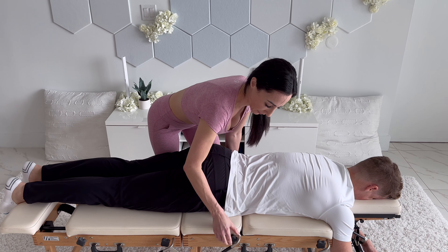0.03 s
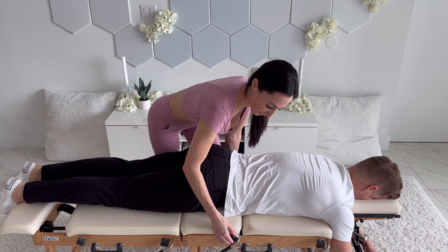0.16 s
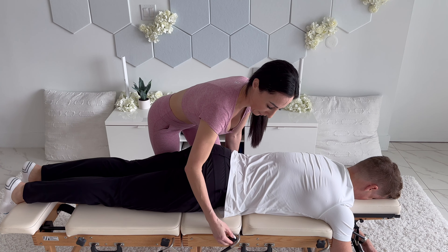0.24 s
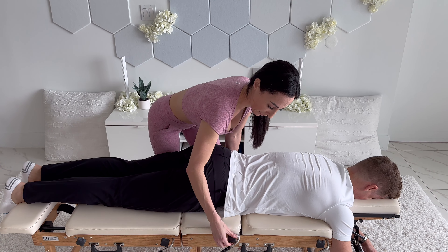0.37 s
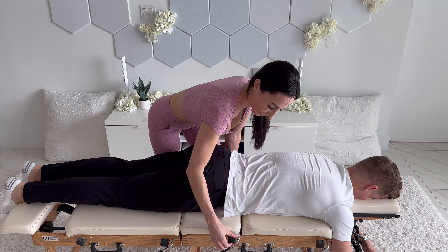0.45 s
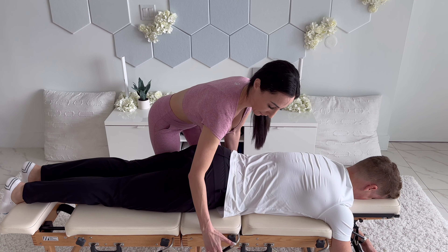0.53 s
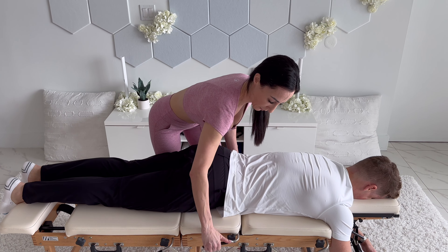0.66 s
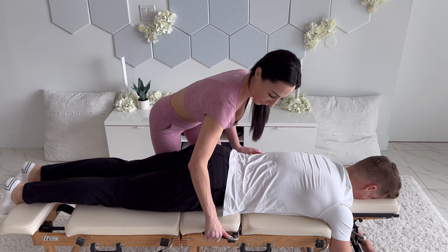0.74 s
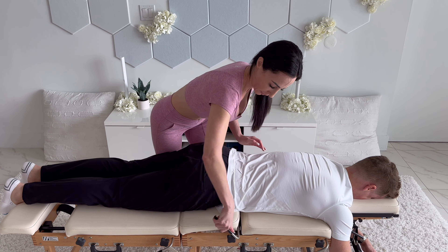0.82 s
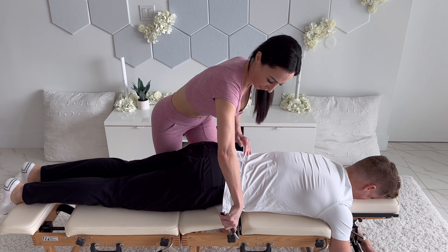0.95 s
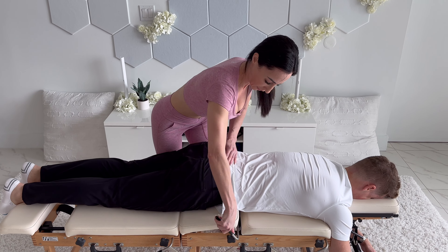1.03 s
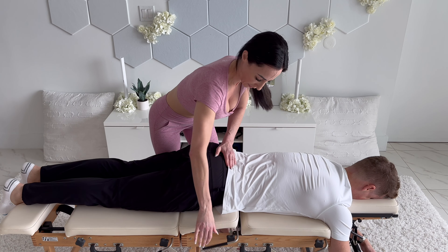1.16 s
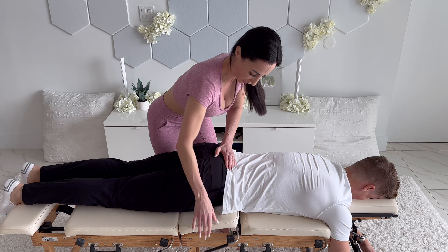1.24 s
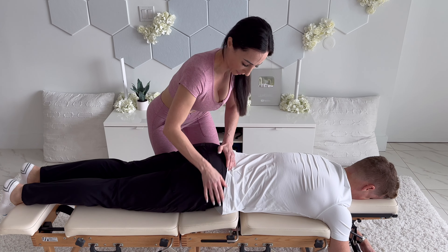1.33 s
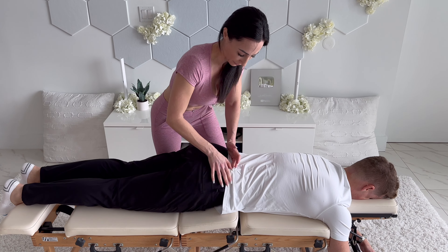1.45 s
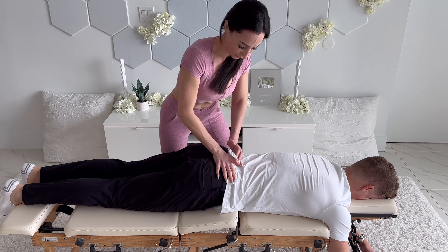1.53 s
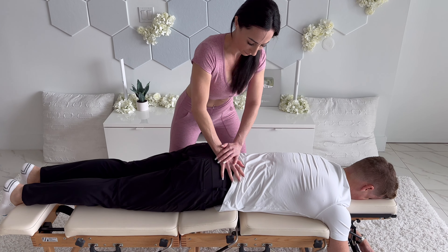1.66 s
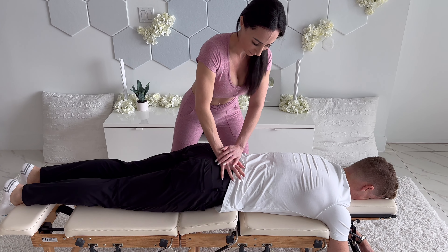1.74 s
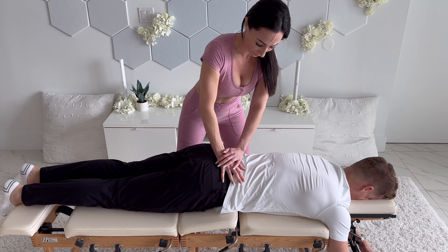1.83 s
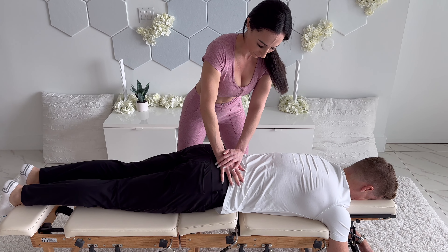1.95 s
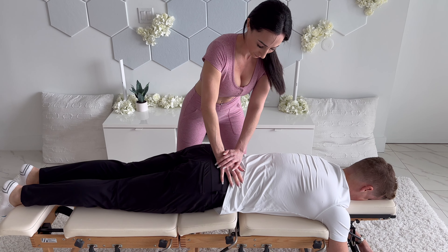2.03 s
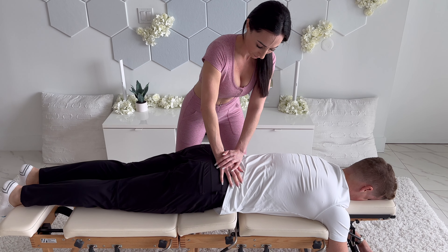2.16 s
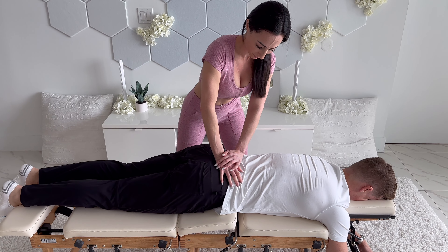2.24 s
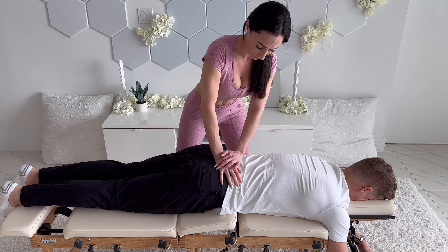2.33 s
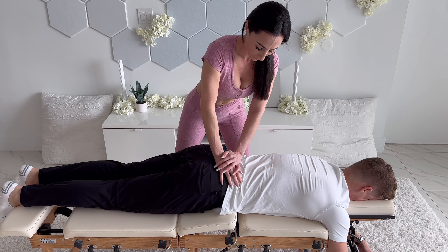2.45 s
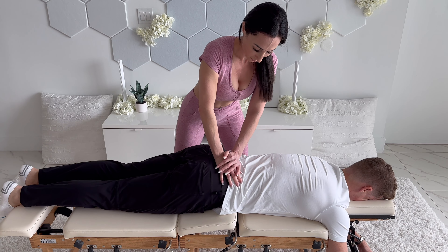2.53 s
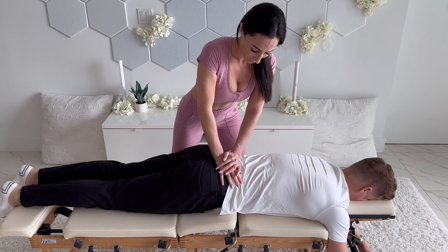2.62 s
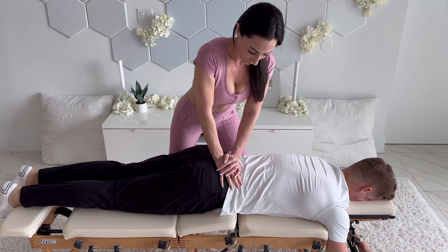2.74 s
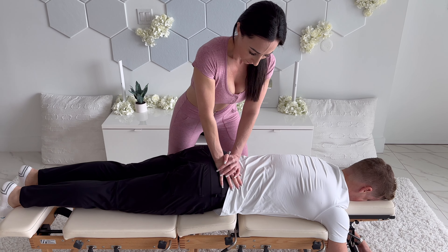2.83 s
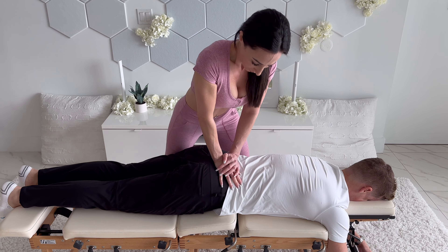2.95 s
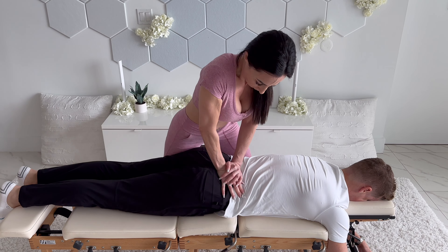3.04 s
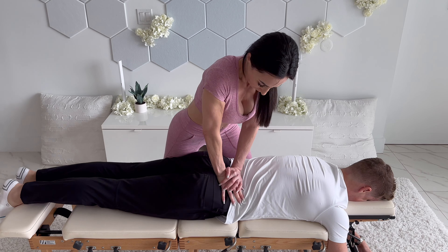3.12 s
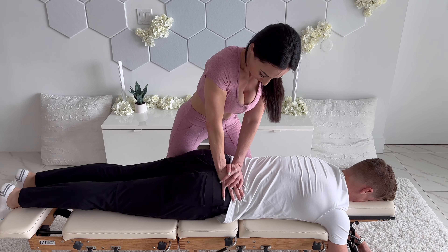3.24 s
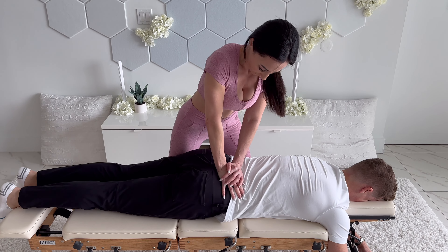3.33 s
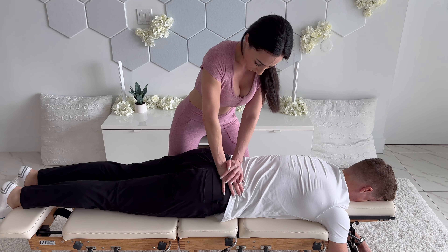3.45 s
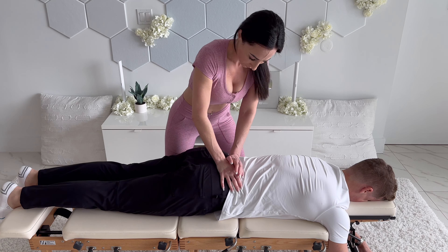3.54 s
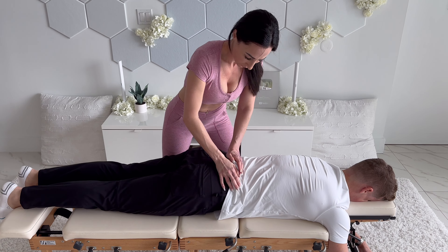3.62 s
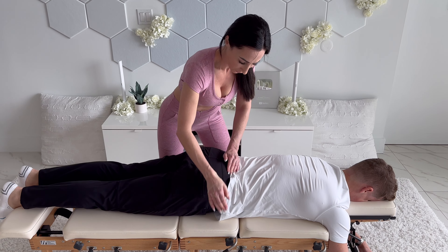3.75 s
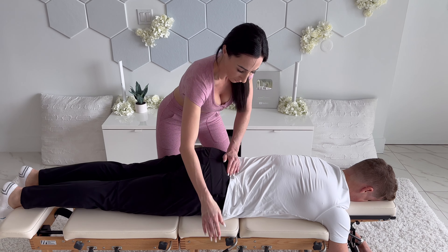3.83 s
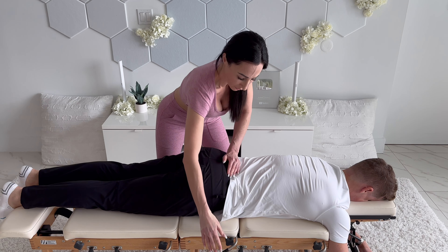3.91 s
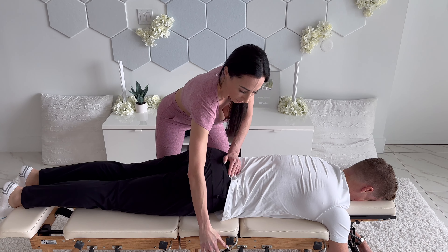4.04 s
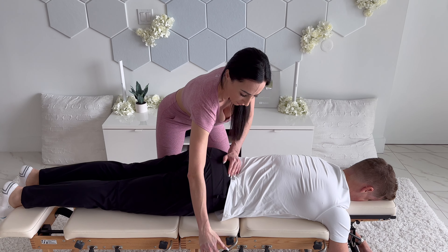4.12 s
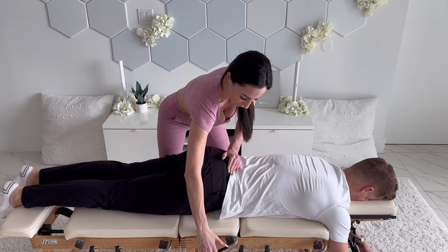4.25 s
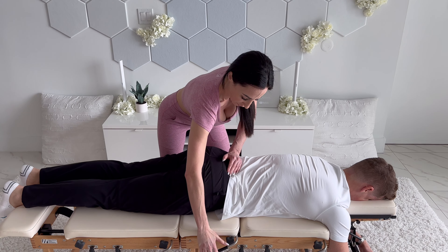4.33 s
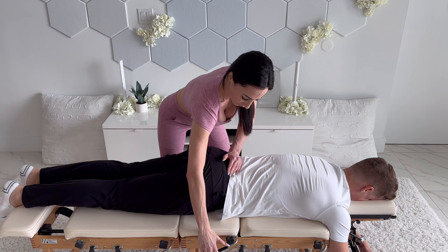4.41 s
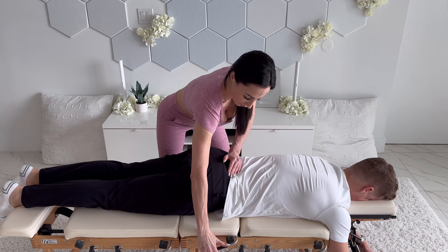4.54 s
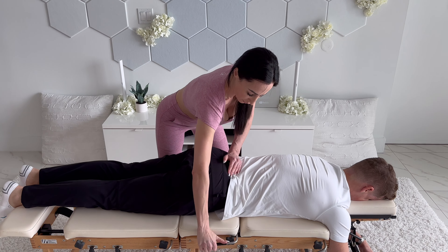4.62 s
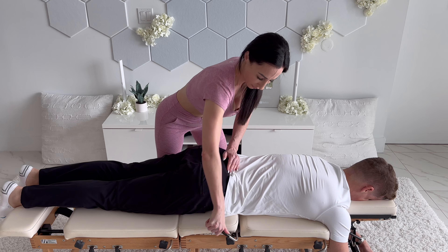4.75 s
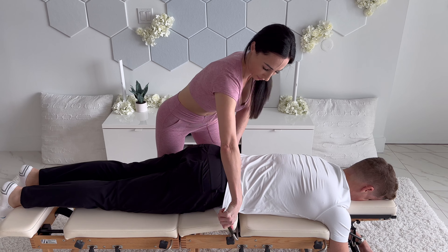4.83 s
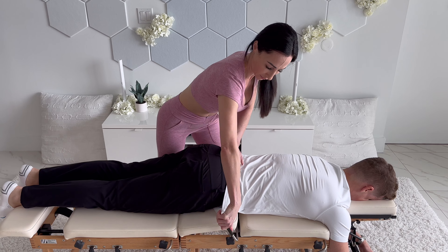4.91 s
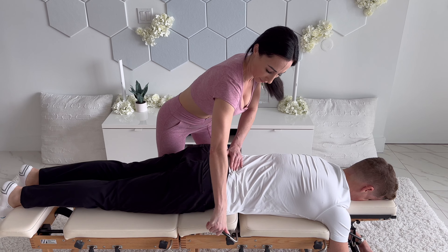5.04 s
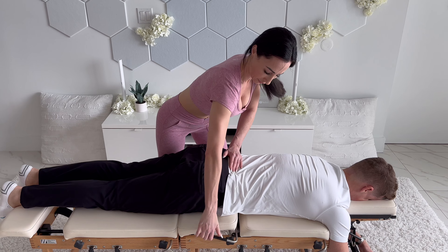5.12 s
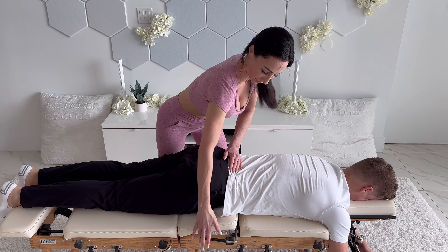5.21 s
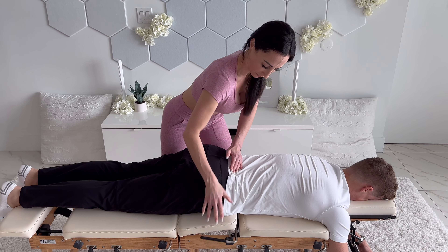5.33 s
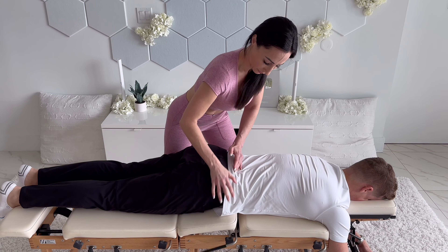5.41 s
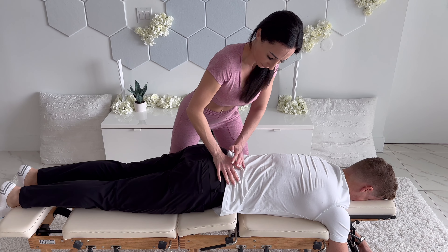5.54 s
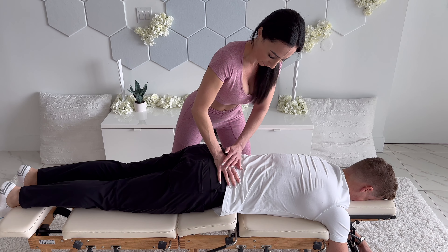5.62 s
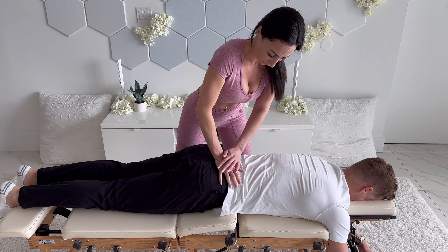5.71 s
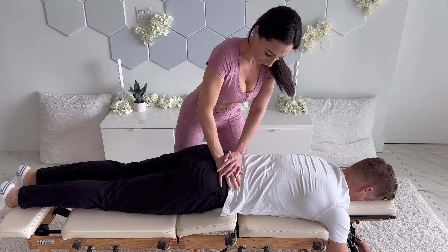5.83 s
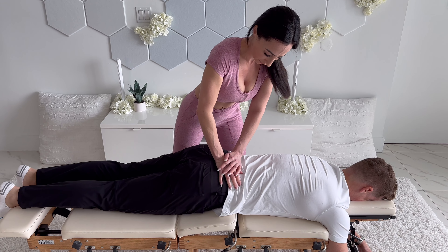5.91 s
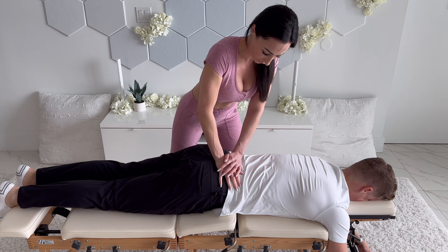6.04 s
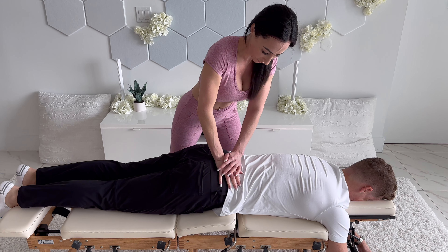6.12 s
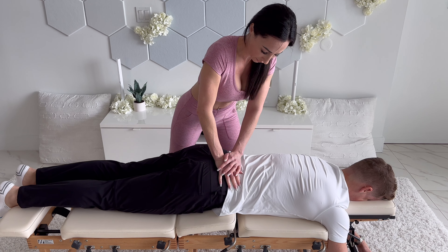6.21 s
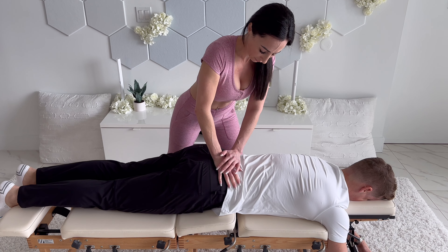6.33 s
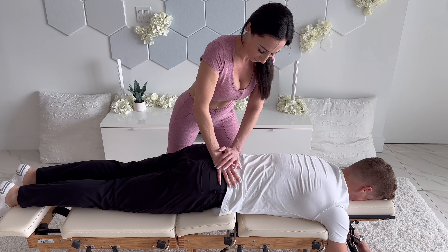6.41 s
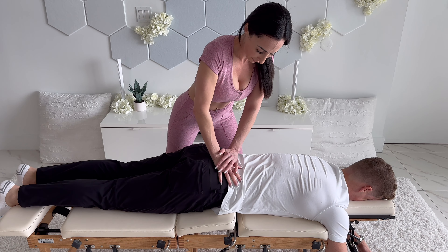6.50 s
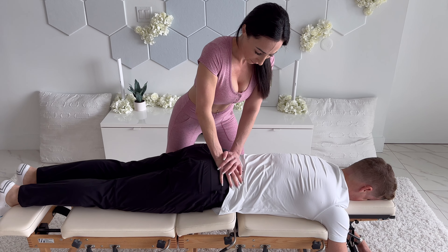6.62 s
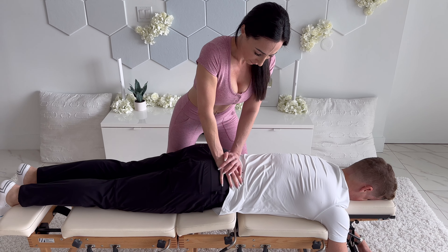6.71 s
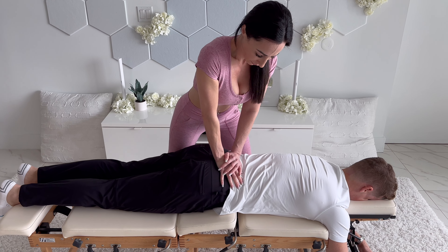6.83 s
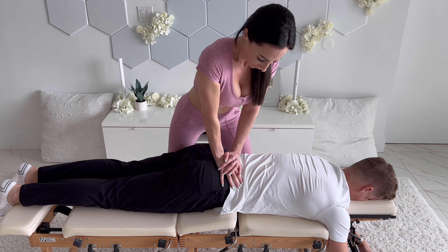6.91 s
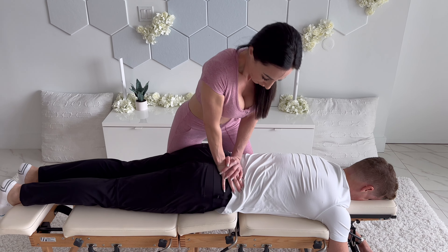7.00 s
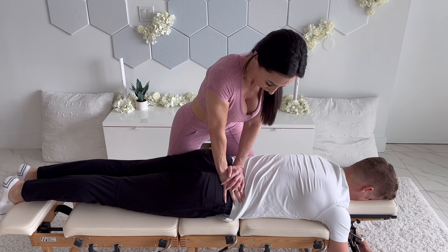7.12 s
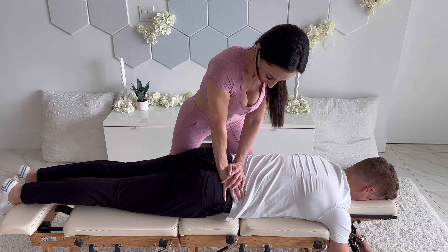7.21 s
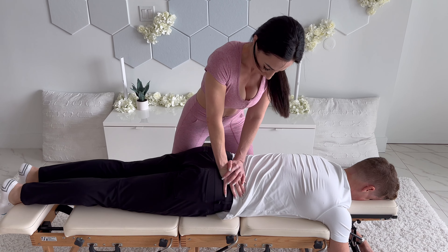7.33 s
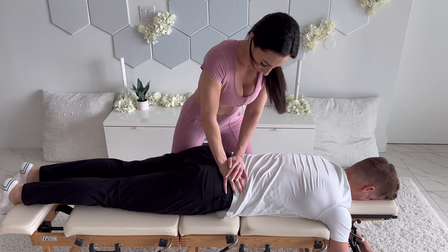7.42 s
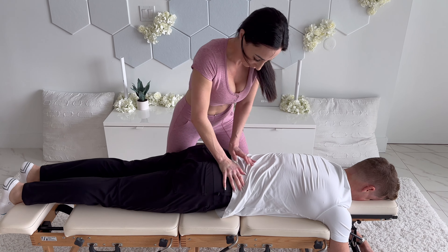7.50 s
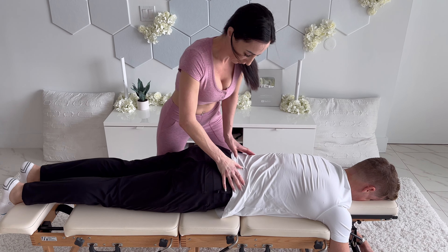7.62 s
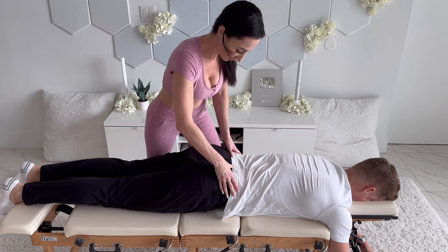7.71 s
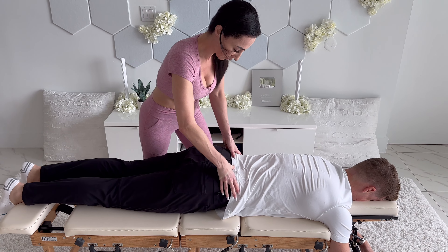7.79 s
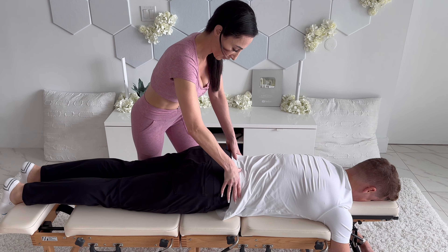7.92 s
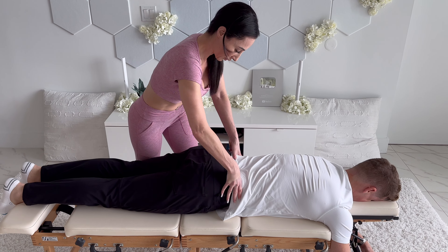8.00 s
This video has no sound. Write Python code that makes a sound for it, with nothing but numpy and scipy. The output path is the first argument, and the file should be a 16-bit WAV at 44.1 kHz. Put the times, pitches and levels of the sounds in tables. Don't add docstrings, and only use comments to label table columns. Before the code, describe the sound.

A padded section of a wooden treatment table is clicked up by a lever, then slams down twice with overloaded clacks in an echoing bare room.

```python
import sys
import numpy as np
from scipy import signal
from scipy.fft import rfft, irfft, next_fast_len
from scipy.io import wavfile
from scipy.ndimage import uniform_filter1d

SR = 44100
rng = np.random.default_rng(int(sys.argv[2]) if len(sys.argv) > 2 else 0)


def voltage_ratio(level):
    return 10 ** (np.asarray(level, float) / 20)


def master(y):
    cut = np.clip(np.atleast_2d(y).T, -1, 1)
    pcm = np.round(cut * 32767)
    wavfile.write(sys.argv[1], SR, pcm.astype(np.int16))


N = 355401
LEAD = SR // 4


def unit(x):
    return x / np.abs(x).max()


def band(x, lo_hz, hi_hz, order=2):
    sos = signal.butter(order, [lo_hz, min(hi_hz, .45 * SR)], "band", fs=SR, output="sos")
    return signal.sosfilt(sos, x + 1e-15)


def resonate(x, peaks):
    total = 0
    for k, (hz, width_hz, db) in enumerate(peaks):
        y = signal.lfilter(*signal.iirpeak(hz, hz / width_hz, SR), x)
        total = total + (-1) ** k * voltage_ratio(db) * np.sqrt(width_hz) * y / np.linalg.norm(y)
    return total


def ring(modes, t):
    return sum(voltage_ratio(db - 60 * t / t60) * np.sin(2 * np.pi * (hz * t + rng.random()))
               for hz, db, t60 in modes)


def coloured(points, size):
    hz, db = np.transpose(points)
    f = np.maximum(np.arange(size // 2 + 1) * SR / size, 1)
    shape = voltage_ratio(np.interp(np.log(f), np.log(hz), db))
    x = irfft(rfft(rng.standard_normal(size)) * shape, size)
    return x / x.std()


def add(out, s, x):
    i = LEAD + int(s * SR)
    out[i:i + len(x)] += x[:len(out) - i]


def leak(x, tau):
    return signal.lfilter([1], [1, -np.exp(-1 / (tau * SR))], x)


def walk(hold_s):
    k = int(hold_s * SR)
    return 1.2 * uniform_filter1d(np.repeat(rng.standard_normal(N // 500), k)[:N], k)


def fade_in_out(t, s, span, fade_s):
    return np.clip(np.minimum(t - s, s + span - t) / fade_s, 0, 1)


# pitch_hz, level_db (per Hz)
AIR_SPECTRUM = [(26, -26.5), (45, -8), (70, 1.5), (88, -14), (124, -7.5), (159, -16), (377, -26.5),
                (1920, -42), (2720, -45.5), (14200, -52), (16500, -58.5)]


def background():
    rumble_db, swell_db, swell_s, air_db = -41.5, 0.5, .4, -47
    rumble = band(band(rng.standard_normal(N), 15, 32), 15, 32)
    rumble = voltage_ratio(rumble_db + swell_db * walk(swell_s)) * rumble / rumble.std()
    return rumble + voltage_ratio(air_db) * coloured(AIR_SPECTRUM, next_fast_len(N))[:N]


# start_s, length_s, level_db, crisp_db (crisp part over dull part)
CLOTH_SLIDES = [
    (1.246, 0.48, -75, 11.5),
    (2.332, 0.4, -65, -19),
    (3.846, 0.27, -58.5, -17),
    (4.3, 0.19, -65.5, -13),
    (4.58, 0.36, -55, -17),
    (6.2, 0.65, -65, -13),
    (7.25, 1.1, -60, -7),
]


def cloth():
    t = np.arange(N) / SR
    sizes = np.repeat(rng.exponential(size=(2, N // 64 + 1)), 64, axis=1)[:, :N]
    grains = rng.standard_normal((2, N)) * voltage_ratio(1.0 * sizes)
    low, high = band(grains[0], 190, 1100), band(grains[1], 1300, 13000)

    def rub(crisp_db):
        return low / low.std() + voltage_ratio(crisp_db) * high / high.std()

    slides = sum(fade_in_out(t, s, span, 0.061) * voltage_ratio(db) * rub(crisp_db)
                 for s, span, db, crisp_db in CLOTH_SLIDES)
    patchy_db, patch_s = 2.5, 0.029
    thrust_db, thrust_db_per_s, thrust_crisp_db = -34.5, 333.5, -11
    thrust = sum((t < s) * voltage_ratio(thrust_db + thrust_db_per_s * np.clip(t - s, -1, 0)) for s, db in SLAMS)
    return slides * voltage_ratio(patchy_db * walk(patch_s)) + thrust * rub(thrust_crisp_db)


# start_s, length_s, level_db
LEANS = [
    (4.024, 0.11, -51.5),
    (4.504, 0.28, -44.5),
    (7.702, .2, -54),
]


def leans():
    t = np.arange(N) / SR
    low = band(rng.standard_normal(N), 95, 254)
    pressure = sum(fade_in_out(t, s, span, 0.024) * voltage_ratio(db) for s, span, db in LEANS)
    return low / low.std() * voltage_ratio(1.4 * walk(.03)) * pressure


# pitch_hz, level_db, decay_s (time to fall 60 dB)
WALLS = [(30, -7.5, 0.24), (59.75, -4, 1.69), (80, -9, 0.71), (122, -6.5, 0.85), (272, -1.5, 0.85),
         (905, 0.5, 0.82), (1700, -2.5, 0.83), (2480, -2.5, 0.67), (3400, -2.5, 0.7), (4840, -3.5, 0.53),
         (8500, -7, 0.45), (15900, -1.5, .28)]
# pitch_hz, half_width_hz, level_db
HUMS = [(56.7, 1.8, 17), (116, 5, 11.5), (147.4, 2.2, 7), (183, 3.4, 3.5), (236, 17, 9), (388, 0.93, 0),
        (484, 60, -2.5), (570, 56, -5), (749.4, 8.8, 8.5), (767, 1.8, 6), (980, 3.9, -12), (1150, 10, -0.5),
        (1309, 3, 12), (1468, 28, -1),
        (1576, 22, -4), (1730, 37, -3.5), (2196, 25, 5), (2356, 140, 3.5), (2760, 90, 2),
            (4270, 24, -6.5), (4600, 20, 0), (5300, 21, 5), (6400, 140, 0.5), (6850, 32, 5), (9700, 96, -4),
            (11350, 110, 5.5)]


def room(x):
    room_db, build_s, first_echo_s = -33, 0.00048, 0.00081
    flutter_db, flutter_hz = 1.17, 89.1
    hz, db, t60 = np.transpose(WALLS)
    x = np.concatenate([np.zeros(int(first_echo_s * SR)), x])[:len(x)]
    size = next_fast_len(len(x))
    bins = np.arange(size // 2 + 1) * SR / size
    hum = 1 + sum(voltage_ratio(g) / (1 + ((bins - f) / width) ** 2) for f, width, g in HUMS)
    noise = irfft(hum * rfft(rng.standard_normal((2, size))), size)[:, :len(x)]
    echo = 0
    for k, f in enumerate(28 * 2 ** np.arange(0, 9.3, 1 / 3)):
        gain_db, decay_s = (np.interp(np.log(f), np.log(hz), column) for column in (db, t60))
        edges = f / 2 ** (1 / 6), f * 2 ** (1 / 6)
        stored = leak(band(x, *edges) ** 2, decay_s / np.log(1e6))
        energy = leak(stored, build_s) / (build_s * SR)
        diffuse = band(noise[k % 2], *edges, order=3)
        echo = echo + voltage_ratio(room_db + gain_db) * np.sqrt(energy) * diffuse / diffuse.std()
    hold = int(SR / flutter_hz)
    flutter = np.repeat(rng.standard_normal(len(x) // 200), hold)[:len(x)]
    return echo * voltage_ratio(flutter_db * uniform_filter1d(flutter, hold // 2))


# start_s, level_db, pitch_hz (centre), width_octaves (each way)
TICKS = [(.0004, -42, 4560, .8), (.0712, -27.5, 4670, 1), (.0864, -47.5, 4600, .8), (0.1542, -30, 8085, 1.),
         (.4853, -51, 5050, .8), (0.601, -14, 7100, 1.), (0.6566, -24, 6810, .8), (.7632, -40, 5150, .3),
         (1.1264, -38.5, 5120, 1.), (1.1854, -37, 4720, 0.93), (1.245, -23, 11900, .3),
         (1.499, -26, 13000, .4), (1.686, -41, 12500, 0.45), (5.481, -28, 11820, .3),
         (1.5487, -31, 4710, .74), (3.6277, -40.5, 12000, 0.46), (3.6456, -22.5, 12500, .6),
         (3.7878, -45, 5770, 0.54), (3.811, -44, 5200, .4), (3.815, -38, 5400, .35),
         (3.819, -39, 5500, 0.45), (3.8237, -39, 5570, 0.27), (4.0003, -48, 8900, 0.8),
         (4.4263, -41, 7150, .65), (4.588, -51.5, 4470, .5), (4.6947, -43, 5050, .64),
         (5.1776, -34, 4400, 0.24)]
# start_s, level_db, pitch_hz (near which it rings)
PINGS = [(.155, -43, 8000), (.6, -36, 6850), (1.245, -35, 11350), (1.5, -42, 11350), (1.686, -55, 11350),
         (1.7, -54.5, 6850), (1.81, -48, 6850), (1.84, -72.5, 6850), (5.48, -40.5, 11350),
         (5.705, -61, 6850), (5.848, -50, 6850)]
# pitch_hz, level_db, decay_s (time to fall 60 dB)
LEVER = [(6850, 4.5, 0.042), (8600, -2, 0.064), (9700, 2, 0.02), (10800, 1, 0.024), (11400, 3, 0.012)]


def ticks():
    near, far = np.zeros(N + LEAD), np.zeros(N + LEAD)
    t = np.arange(SR // 5) / SR
    for s, db, hz, octaves in TICKS:
        click = rng.standard_normal(len(t)) * np.exp(-t / 0.0002)
        tick = voltage_ratio(db) * unit(band(click, hz / 2 ** octaves, hz * 2 ** octaves))
        add(near, s, tick)
        add(far, s, voltage_ratio(1.5 + .4 * db) * tick)
    for s, db, hz in PINGS:
        modes = [(f, g - 30 * abs(np.log2(f / hz)), t60) for f, g, t60 in LEVER]
        ping = voltage_ratio(db) * ring(modes, t)
        add(near, s, ping)
        add(far, s, voltage_ratio(-7) * ping)
    return near, far


# start_s, level_db, gap_s (first touch to full blow), rebound_db, crack_db (of the touch)
STROKES = [
    (1.232, -7.5, .005, -32, -8),
    (1.482, -9.5, .010, -3, -7.5),
    (1.671, -12, .009, -1, -12.5),
    (1.799, -13.5, .013, -2.5, -17),
    (5.467, -8, 0.0047, -22, -12),
    (5.678, -8.5, 0.0085, -5.5, -14.5),
    (5.819, -13, 0.0082, -3, -21),
]


def strokes():
    thud_db, rebound_s = -5.5, 0.023
    rows = []
    for s, db, gap, back_db, crack in STROKES:
        rows.append((s, db + 3.5 - 900 * gap, thud_db, crack))
        rows.append((s + gap, db, thud_db, crack - 17.5))
        rows.append((s + gap + rebound_s, db + back_db, thud_db - 4, crack - 13.5))
    return rows


# start_s, knock_db, thud_db, crack_db, edge_db
LATCH = [
    (.874, -20, 1.5, 5, -6),
    (.892, -15, 4.5, -1, 4),
    (4.808, -23, 3, 8, -5),
    (4.821, -13.5, 3, -30, -5),
    (4.827, -15, 3.5, 1, 5.5),
]
# start_s, level_db
PLATE_TAPS = [(3.431, -40), (3.52, -38), (3.579, -35), (3.646, -29.5), (3.72, -34), (3.791, -52),
              (7.439, -32), (7.533, -24), (7.605, -25.5), (7.7, -52), (7.77, -36)]
# pitch_hz, level_db, decay_s (time to fall 60 dB)
LATCH_RING = [(2510, -0.5, .3), (2740, -5.5, .3), (4370, -8.5, .3), (5240, 2, 0.23), (6950, -7, .3),
              (7940, -5.5, 0.32), (9000, 0, .2), (9792, -5.5, .25)]
STROKE_RING = [(2300, -8, .2), (2702, -3, 0.17), (2610, -0.5, .25), (3920, 2.5, .12), (6070, -17.5, 0.1),
               (6530, -10, .08), (8600, -11.5, 0.055)]
PLATE = [(780, -1, 0.24), (1160, -1, 0.27), (1630, -1, 0.22), (1830, -10, 0.22), (2600, -11, .15)]


def steel():
    out, t = np.zeros(N + LEAD), np.arange(SR // 3) / SR
    hits = [(s, -13 + db + crack, LATCH_RING) for s, db, thud, crack, edge in LATCH]
    hits += [(s, db, PLATE) for s, db in PLATE_TAPS]
    hits += [(s, -3 + db + crack, STROKE_RING) for s, db, thud, crack in strokes()[::3]]
    for s, db, modes in hits:
        add(out, s, voltage_ratio(db) * unit(ring(modes, t)) * np.minimum(t / .0015, 1))
    return out


# pitch_hz, width_hz, level_db
FRAME = [(392, 150, 2), (508, 100, 5.5), (624.5, 120, 3), (822, 92, 4), (990, 87, 0), (1234, 282, 0),
         (1340, 690, -12)]
RAILS = [(1740, 65, 2.5), (2000, 740, -6), (2475, 160, 0.5), (2620, 380, -6.5)]
STOP = [(4130, 1200, -6.5), (6560, 170, -2.5), (6970, 240, -11)]


def blows(table, pad, contact_s, grit_db, grain_s):
    out, t = np.zeros(N + LEAD), np.arange(SR // 9) / SR
    fade = t / contact_s
    for s, db, thud_db, rail_db, crack_db, edge_db in table:
        sizes = np.append(2, rng.exponential(size=999))[(t / grain_s).astype(int)]
        rough = rng.standard_normal((4, len(t))) * voltage_ratio(grit_db * sizes) * np.minimum(t / 0.001, 1)
        thud = resonate(band(rough[0] * np.exp(-fade / 1.7), 57, 440), pad)
        wood = band(rough[1] * np.exp(-fade), 190, 3600)
        knock, rail = resonate(wood, FRAME), resonate(wood, RAILS)
        crack = unit(resonate(rough[2] * np.exp(-fade / 1.2), STOP))
        crack = crack + 0.73 * unit(band(rough[2] * np.exp(-fade / 0.94), 1900, 7000))
        edge = rough[3] * np.exp(-fade / 0.28)
        edge = band(edge, 8000, 10000) + voltage_ratio(-8.5) * band(edge, 10500, 16000)
        parts = (thud_db, thud), (0, knock), (rail_db, rail), (crack_db, crack), (edge_db, edge)
        add(out, s, voltage_ratio(db) * sum(voltage_ratio(part_db) * unit(part) for part_db, part in parts))
    return out


def voiced(rows, rail_db, edge_db):
    return [(s, db, thud, rail_db - 2.4 + 0.36 * crack, crack, edge_db - 7 + 2.8 * crack)
            for s, db, thud, crack in rows]


# start_s, level_db
SLAMS = [
    (-.24, 0.5),
    (3.067, 1.5),
    (7.069, 1.5),
]
# delay_s, knock_db, thud_db, crack_db (last two relative to the knock)
LANDING = [
    (0, -5.5, 7.5, -8.5),
    (.008, 4.5, 2.5, -9.5),
    (.02, 1.5, 1, -1),
    (.031, 3.5, 5.5, -8.5),
    (.05, -0.5, -5, -9),
    (.074, -2, -6, -7.5),
    (.09, -8, -5.5, -11),
    (.108, -9, -11, -12),
    (.135, -14.5, -6.5, -5.5),
]


def drops():
    return [(s + late, db + knock, thud, crack) for s, db in SLAMS for late, knock, thud, crack in LANDING]


# start_s, knock_db, thud_db, crack_db
KNOCKS = [(.611, -17.5, 0.5, -12), (.659, -17, 1.5, -25), (1.088, -17, -15, -58), (1.127, -16, -13, -39),
          (3.008, -33.5, 9.5, -14), (4.163, -24, -1.5, -39), (4.698, -39, 3, -18), (5.03, -17, -14, -39),
          (5.117, -17, -5, -26), (7.016, -29.5, 7, -13), (7.532, -24.5, -15, -23)]
# start_s, knock_db, thud_db, crack_db
RATTLES = [(.637, -17, -12.5, -30), (.699, -53, 1, -31), (1.104, -32, -6, -33), (1.157, -16, -7, -30.5),
           (1.179, -18, -9, -42), (3.429, -28, -27, -17), (3.518, -29.5, -8, -14), (3.579, -27, -1, -30),
           (3.641, -28, -6, -32), (3.724, -27.5, -23, -50), (4.051, -47, 7, -30), (4.185, -36.5, -8, -48),
           (4.794, -32, 10, -26), (5.053, -33.5, 13.5, -30), (5.08, -21, -31, -35), (5.134, -20, -29, -26),
           (7.44, -20, -19, -21), (7.569, -32, -25, -28), (7.605, -27, -9, -25), (7.699, -28, -18, -49)]
# pitch_hz, width_hz, level_db
PAD = [(67, 8.9, -8), (127.4, 7, 5.5), (138.7, 6.4, 2), (183, 60, 0), (227, 57, 0), (257, 57, -0.5)]
PAD_LOADED = [(29, 2.1, -13.5), (53.4, 7.3, -13.5), (112, 57, 0), (144, 26, 1.5), (186, 24, 2),
              (218.4, 44, -4.5), (298, 35, -7)]


def treatment_table():
    hard = voiced(strokes(), rail_db=3.8, edge_db=-7) + voiced(KNOCKS, rail_db=1.5, edge_db=-2.7)
    hard += [(s, db, thud, -1.5 + 0.95 * crack, crack, edge) for s, db, thud, crack, edge in LATCH]
    slams = voiced(drops(), rail_db=1.16, edge_db=2.5)
    loose = voiced(RATTLES, rail_db=5.5, edge_db=-8.5)
    out = blows(slams, PAD_LOADED, contact_s=0.0067, grit_db=3.8, grain_s=0.0013)
    out = out + blows(hard, PAD, contact_s=0.0054, grit_db=1.1, grain_s=0.0011)
    out = out + blows(loose, PAD, contact_s=0.012, grit_db=6., grain_s=0.0047)
    return out + steel()


def scene():
    table = treatment_table()
    near, far = ticks()
    in_room = (table + near + room(table + far))[LEAD:]
    return (in_room + cloth() + leans() + background())[None]


def top_cut(x):
    return signal.sosfilt(signal.butter(12, 16670, fs=SR, output="sos"), x)


def record(dry):
    clip_level, knee, overshoot = .79, 6, 0.021
    squashed = dry / (3.0 + np.abs(dry / clip_level) ** knee) ** (1 / knee)
    x = (1 - overshoot) * squashed + overshoot * dry
    x = signal.sosfilt(signal.ellip(6, .3, 22, 15800, fs=SR, output="sos"), x)
    return top_cut(x)


dry = scene()
out = record(dry)
master(out)
```